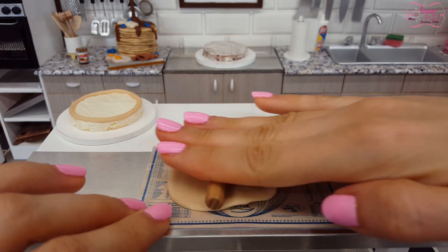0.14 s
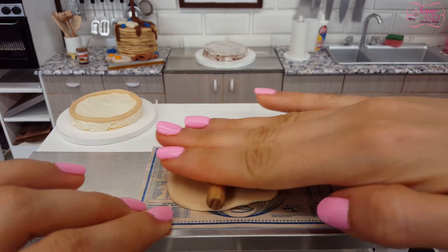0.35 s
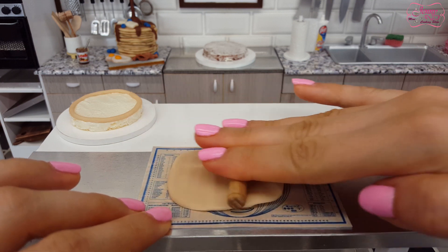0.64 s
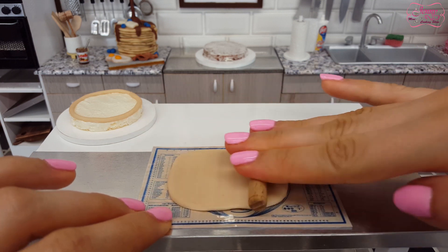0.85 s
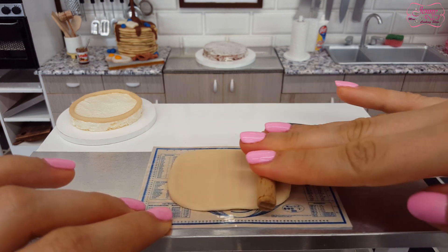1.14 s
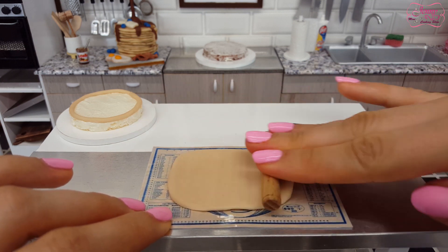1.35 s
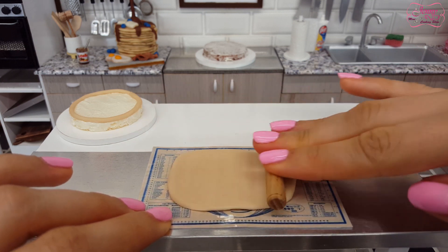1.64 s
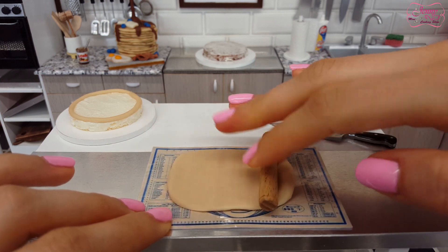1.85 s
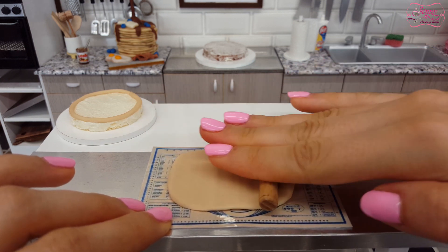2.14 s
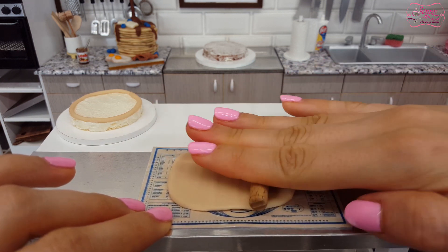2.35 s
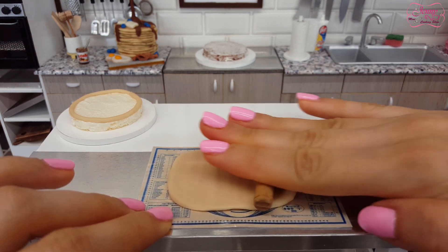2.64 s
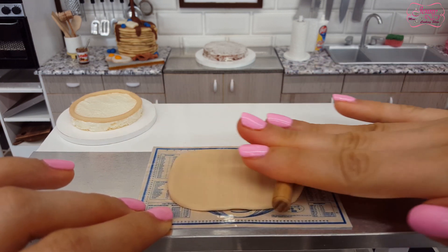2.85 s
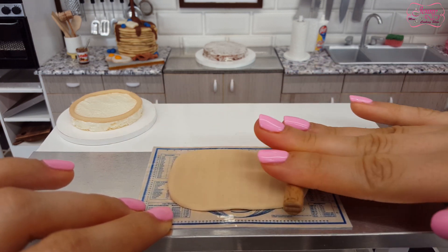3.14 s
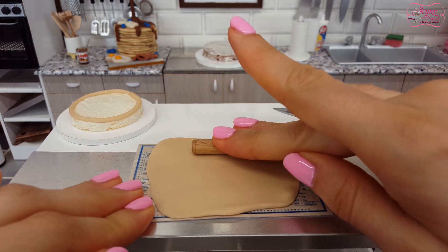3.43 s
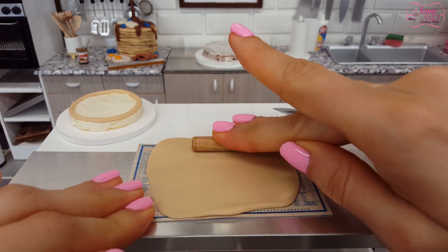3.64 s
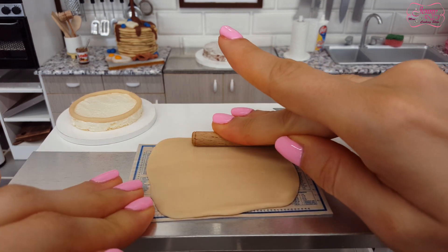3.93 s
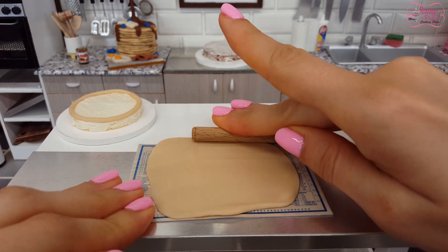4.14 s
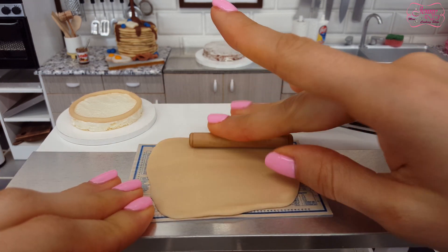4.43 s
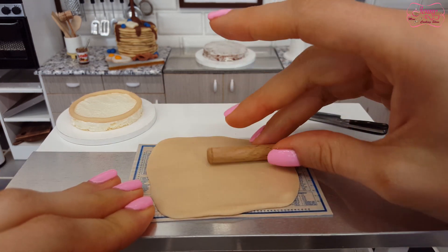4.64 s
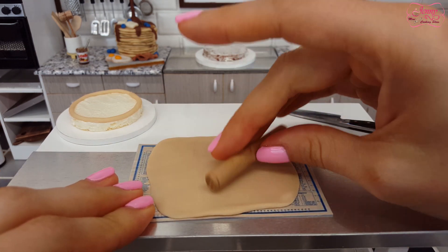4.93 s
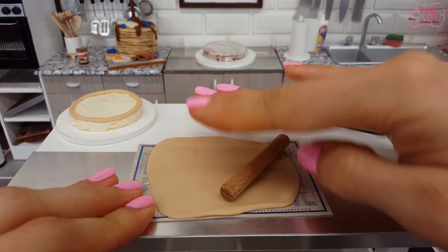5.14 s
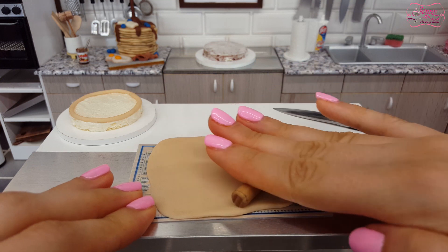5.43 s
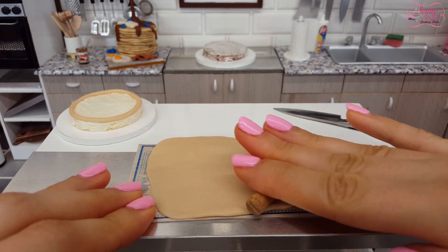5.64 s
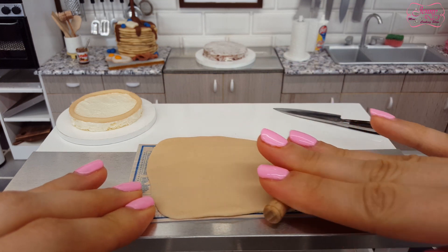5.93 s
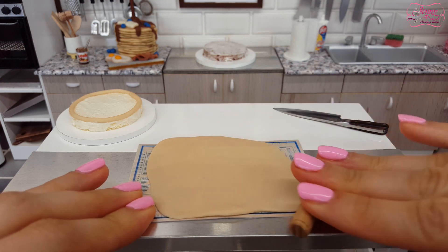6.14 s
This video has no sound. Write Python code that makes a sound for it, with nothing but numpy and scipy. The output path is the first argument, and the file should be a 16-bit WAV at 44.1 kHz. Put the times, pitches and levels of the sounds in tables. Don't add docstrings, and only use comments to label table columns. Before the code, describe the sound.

A small wooden rolling pin works dough on a mat over a thin steel counter. Soft padded bumps and irregular wooden clicks come in clusters, some landing harder with a short hollow metallic ring and low table thud. Midway it thins to light taps and faint scuffs, then a brief gritty drag, a hard double knock and more rolling bumps. Close microphone, small room, steady soft hiss.

```python
import sys
import numpy as np
from scipy import signal
from scipy.fft import rfft, irfft, next_fast_len
from scipy.io import wavfile
from scipy.ndimage import map_coordinates

SR = 44100
rng = np.random.default_rng(int(sys.argv[2]) if len(sys.argv) > 2 else 0)


def store_wav(level_fs):
    pcm = np.round(np.clip(np.atleast_2d(level_fs), -1, 1) * 32767)
    wavfile.write(sys.argv[1], SR, pcm.T.astype(np.int16))


def convert_level_to_amplitude(level_db):
    exponent = np.asarray(level_db, float) / 20
    return 10 ** exponent


N = 277161

# (time [s], sheet ring [dB], overtones over ring [dB],
# pin click over ring [dB], free pin pitch [Hz])
BLOWS = [(0.288, -36, -10.5, 4, 1943), (0.354, -43, -1, -5, 2150), (0.616, -34, -13, -8.5, 2105),
         (0.627, -36, 3, 3, 2007), (0.658, -27.5, -7.5, -9, 2093), (0.782, -31.5, -2, -12, 2293),
         (2.609, -29, -6, -9.5, 2493), (2.891, -15, -6, -5.5, 2537), (2.913, -29, -6.8975, -23, 2250),
         (3.05, -38, -6, -3, 2460), (3.059, -37.5, -2, -5.2921, 1820), (3.283, -29.5, -11, -12.5, 2722),
         (3.681, -40, -6, -8, 2146), (5.104, -26, -8, -9, 3509), (5.11, -17.5, -31, -13, 2150),
         (5.605, -35.5, -13.5, -17, 2918), (5.709, -43.5, -0.5, -2.5, 2680), (5.734, -49, -4.5, 4.5, 3198),
         (5.86, -52, 4, -1.5, 1803), (5.995, -44, 9.5, 11.5, 2631), (6.005, -47, 4.5, 7, 2204),
         (6.078, -34.5, -6, 2.5, 2940), (6.12, -25, -5, -5, 2683)]
# (time [s], sheet ring [dB], overtones over ring [dB])
BUMPS = [(0.115, -52.5, -7), (0.141, -44.5, -7), (0.266, -54, -3), (0.491, -43.5, -6),
         (0.596, -42, -7.5), (0.606, -37, -8), (0.649, -51.5, 9), (0.808, -34.5, -12),
         (0.813, -47, 0), (0.901, -41.5, -10), (0.923, -41, -13.5), (1.05, -51, -18.5),
         (1.076, -36, -7.5), (1.089, -25.5, -14), (1.105, -47, -8.5), (1.118, -47, -19),
         (1.177, -58, -13.5), (1.198, -44.5, -25.5), (1.208, -39, -29), (1.317, -52.5, -16),
         (1.36, -31, -17), (1.37, -42.5, -3), (1.446, -51.5, -20), (1.647, -48, -23),
         (1.819, -46.5, -17.5), (1.951, -49.5, -15.5),
         (2.218, -52.5, -17.5), (2.282, -48.5, -27.5), (2.402, -61, -7), (2.758, -48.5, -6.5),
              (2.946, -50.5, 9.5), (3.161, -57.5, -11), (3.175, -43.5, -4.5), (3.189, -44.5, -18.5),
              (3.218, -41.5, -9.5), (3.226, -55, 1.5), (5.142, -44.5, -13.5), (5.412, -49, -12.5),
              (5.744, -42, -13), (5.77, -59, -4.5), (5.787, -30, -14), (5.827, -21.5, -13.5),
              (5.88, -32.5, -17.5), (5.917, -50.5, 2.1861), (5.926, -38, -14), (5.972, -45, -14),
              (6.023, -40, -16.5), (6.038, -33, -15), (6.059, -50, -3.5), (6.151, -66, -18),
              (6.163, -37.5, -9.5), (6.208, -42, -7), (6.242, -45, -15)]
# (time [s], click [dB], free pin
# pitch [Hz])
CLICKS = [(0.342, -52, 2173), (0.575, -53.5, 2150), (2.447, -56.5, 2120), (2.746, -53.5, 2600),
          (3.8, -49.5, 2213), (4.002, -53, 2416), (4.024, -58.5, 2672), (4.208, -54.5, 2613),
          (4.284, -57.5, 2160), (5.676, -60.5, 2000), (6.116, -47.5, 2582)]


def contacts():
    gripped_hz = 2124.2
    bumps = []
    for s, ring_db, over_db in BUMPS:
        click_db = -61.5 + 0.219 * (ring_db + 44)
        bumps.append((s, ring_db, over_db, click_db - ring_db, gripped_hz))
    sheet_db = -5
    clicks = [(s, click_db + sheet_db, 0, -sheet_db, hz) for s, click_db, hz in CLICKS]
    return np.transpose(BLOWS + bumps + clicks)


# (frequency [Hz], level [dB], t60 [s])
SHEET = [(477.8, -3.5, 0.01317), (569, -34, 0.097), (653.58, 30, 0.014689), (767.13, 2.5, 0.2029),
         (778.34, -21.5, 0.18)]


def sheet_ring(s, ring_db):
    modes = struck(s, ring_db - 34.5, SHEET, 457.35, 997, spot_db=2.5)
    return modes + clamped(s, ring_db - 11.5)


def clamped(s, level_db):
    hz, t60, stopped_share = 666, .085, .97
    free_s = 8 / hz
    settle_db = -60 * free_s / t60
    force = pushes(s, level_db) - stopped_share * pushes(s + free_s, level_db + settle_db)
    return band(ring(force, hz, t60), 440, 1050)


# (frequency [Hz], level [dB], t60 [s])
OVERTONES = [(998.8, 6, 0.019322), (984, 1, 0.00818), (1320.3, -4.5, 0.04052), (1398.8, -8, 0.047)]


def sheet_overtones(s, over_db):
    return -struck(s, over_db - 9.5, OVERTONES, 865.6, 1556.8, spot_db=0.0, alternate=False)


# (frequency [Hz], level [dB], t60 [s])
PIN = [(1860, -4, .016), (2150, 1, .022), (2380, 0, .018), (2700, -1, .014), (2900, -3, .012),
       (3350, -5, .012), (3640, -8, .014)]


def pin_click(s, click_db, free_hz):
    mode_hz = np.transpose(PIN)[0]
    mode_db = (click_db - 4.0)[:, None] + grip_db(mode_hz, free_hz[:, None])
    modes = struck(s, mode_db, PIN, 1988, 5880, spot_db=3.0, alternate=False)
    dull = crack(s, click_db + grip_db(2100, free_hz) - 19.5, 2400, 2470, 0.056)
    sharp = crack(s, click_db + grip_db(3000, free_hz) + 12.0, 3355.8, 3700, 0.008096)
    return band(dull + sharp - modes, 1400, 3087.3)


def grip_db(hz, free_hz):
    return -18 * (np.log2(hz / free_hz) / .5) ** 2


def flour_snap(s, over_db):
    return crack(s, over_db + 3.0, 596.45, 1641.3, 0.053764)


# (time [s], peak [dB], brightness over peak [dB])
TICKS = [(0.5751, -46, -14), (0.627, -50, -17.5), (0.6568, -68, -16), (2.607, -41.5, -19.5),
         (2.89, -64.5, -21), (3.0495, -59, -4), (3.2837, -32, -28.5), (3.291, -43.5, -19),
         (3.7994, -49.5, -16.5), (4.2855, -44, -11.5), (5.103, -31.5, -19.5), (5.1084, -28, -28),
         (5.7074, -68.5, -12), (5.733, -56.5, -17), (5.9936, -43, -11), (6.0044, -55.5, -6),
         (6.0769, -38.5, -15.5), (6.1176, -44.5, -23.5)]
# (frequency [Hz], level [dB], t60 [s])
TICK = [(4162.7, -3, 0.005038), (5011, -7.5, 0.0043), (7273, -7, 0.002)]
# (frequency [Hz], level [dB], t60 [s])
BRIGHT_TICK = [(9226.6, -17, 0.00917), (10437, -27.5, 0.0036), (13030, -33.5, .003)]


def ticks():
    s, peak_db, bright_db = np.transpose(TICKS)
    s = s + 0.0011
    top_db = peak_db + bright_db
    edge = struck(s, peak_db - 9.5, TICK, 3461, 6100, spot_db=2)
    edge_snap = crack(s, peak_db - 16.0, 2733, 7527, 0.02657)
    top = struck(s, top_db + 4, BRIGHT_TICK, 7776, 15000, spot_db=8.5)
    top_snap = crack(s, top_db + 3, 10793, 10818, 0.00734)
    return edge + edge_snap + top + top_snap


# (time [s], peak [dB])
KNOCKS = [(0.287, -39.5), (0.649, -49), (0.9, -64), (0.921, -53), (1.36, -52), (1.496, -61.5), (2.282, -41),
          (2.401, -57.5), (2.608, -37), (2.746, -58), (2.757, -49.5), (2.891, -46), (3.282, -41.5),
          (3.682, -63.5), (5.827, -45), (5.995, -51), (6.038, -54.5), (6.078, -56), (6.119, -42)]
# (frequency [Hz], level [dB], t60 [s])
MAT = [(279.4, -2, 0.01413), (454.68, -1.5155, 0.015343), (534.7, 5.0042, 0.007551)]


def knocks():
    s, peak_db = np.transpose(KNOCKS)
    return -struck(s, peak_db + 2.5, MAT, 255.26, 815.4, spot_db=3.0, alternate=False)


# (time [s], thud [dB])
THUDS = [(0.288, -34), (0.341, -66), (0.493, -48), (0.598, -50), (0.629, -37.5), (0.809, -47),
         (1.049, -49.5), (1.075, -42), (1.106, -47), (1.361, -40.5), (1.5, -51.5), (2.219, -53),
         (2.283, -36.5), (2.403, -36.5), (2.447, -38.5), (2.609, -39), (2.746, -40), (2.89, -32.5),
         (2.927, -38.5), (3.19, -45), (3.284, -42.5), (3.684, -41.5), (4.652, -45.5), (5.108, -31.5),
         (5.143, -42.5), (5.703, -49), (5.789, -40), (5.86, -46.5), (6.079, -45.5), (6.119, -46)]
# (frequency [Hz], level [dB], t60 [s])
TABLE = [(146.91, -12.5, 0.11895), (193.25, -1, 0.1529), (234.31, -5, 0.12286)]


def thuds():
    s, thud_db = np.transpose(THUDS)
    return struck(s, thud_db - 9.5, TABLE, 140, 380, spot_db=4.0, alternate=False)


# (time [s], pin level [dB], sheet over pin [dB], spread [s])
SLIPS = [
    (4.658, -58, -4, 0.02702),
    (4.691, -57.5, 0.5, 0.05065),
    (4.732, -56, 6.5, 0.02168),
    (4.765, -62, -6, 0.02796),
    (4.788, -60.5, 8, 0.04524),
    (4.86, -72, 12.5, 0.03416),
]
# (time [s], pin level [dB], sheet over pin [dB], spread [s])
SCUFFS = [
    (4.026, -53, -2.5, 0.012485),
    (4.2, -65.5, -11.5, 0.0759),
    (4.291, -58, -9, 0.02066),
    (4.35, -70.5, -1, 0.0641),
]
# (frequency [Hz], level [dB], t60 [s])
FREE_PIN = [(2000, 8.5, 0.005147), (2150, 3.5, 0.01935), (2600, 6, 0.005237), (3300.7, -9.5, 0.0417),
            (3532.1, -2, 0.01448)]
# (frequency [Hz], level [dB], t60 [s])
RASP = [(4543.4, 0.5, 0.002478), (6007, 0.5, 0.00261), (7131, -3, 0.002357), (8578, -5, 0.00547),
        (10597, -4, 0.002138), (12513, -6.5, 0.0017)]


def drags():
    s, pin_db, sheet_db, spread = np.transpose(SLIPS + SCUFFS)
    rasp_db = np.repeat([-9.5, -23.5], [len(SLIPS), len(SCUFFS)])
    sheet = band(rubbed(SHEET + OVERTONES, 1.835), 483.9, 2300)
    sheet = swells(s, pin_db + sheet_db, spread, spread) * sheet
    pin = swells(s, pin_db, spread, spread) * rubbed(FREE_PIN, 2.383)
    rasp = swells(s, pin_db + rasp_db, spread, spread) * rubbed(RASP, 2.403)
    return sheet + pin + rasp


def squeak():
    tone = unit(ring(rng.standard_normal(N), 8790, .016))
    return swells(5.105, -56, 0.02342, 0.01064) * tone


# (time [s], murmur [dB], spread [s])
STROKES = [
    (0.28, -62, 0.1548),
    (0.85, -86, 0.469),
    (1.13, -67, 0.1366),
    (1.45, -74, 0.2014),
    (2.3, -76, 0.2614),
    (2.69, -68, 0.3875),
    (3.17, -59.5, 0.0734),
    (5.33, -72.5, 0.181),
    (5.8, -61.5, 0.299),
]


def rolling():
    s, murmur_db, spread = np.transpose(STROKES)
    return swells(s, murmur_db, spread, spread) * rubbed(SHEET, 4.5)


# (time [s], jolt [dB])
LEANS = [(0.119, -53), (0.295, -63), (0.51, -71.5), (0.654, -52.5), (1.081, -54), (1.248, -57),
         (2.221, -48.5), (2.419, -58.5), (2.598, -80.5), (2.74, -67.5), (3.041, -70), (4.909, -71.5),
         (5.107, -62.5), (6.1, -62.5)]
# (frequency [Hz], level [dB], t60 [s])
LEGS = [(57.572, -7.5, 1), (63.694, -10, 0.38)]
# (frequency [Hz], level [dB per Hz])
SWAY = [(20, -51.5), (40, -19), (58, -13.5), (75, -13.5), (110, -29), (160, -52)]


def table():
    s, jolt_db = np.transpose(LEANS)
    unrest_db = 2
    sway = convert_level_to_amplitude(-72.5 + unrest_db * wobble(8.3)) * coloured(SWAY)
    hum = convert_level_to_amplitude(-74 + unrest_db * wobble(6.7)) * rubbed(TABLE, 1.7)
    return sway + hum + struck(s, jolt_db + 3.5, LEGS, 28, 120, spot_db=0.5, alternate=False)


# (frequency [Hz], t60 [s])
ROOM = [(200, 0.7698), (700, 0.24186), (2500, 0.2509), (8000, 0.19704)]


def room(x):
    out, piece = np.zeros(N + SR), SR // 4
    delay = int(.006 * SR)
    for start in range(0, N, piece):
        hz, t, z = signal.stft(rng.standard_normal(SR // 2), SR, nperseg=256)
        decay = convert_level_to_amplitude(-60 * t / along(ROOM, hz)[:, None])
        tail = signal.istft(z * decay, SR, nperseg=256)[1]
        wet = signal.fftconvolve(x[start:start + piece], tail / np.linalg.norm(tail))
        out[start + delay:][:len(wet)] += wet
    return out[:N]


# (frequency [Hz], level [dB per Hz])
HISS = [(15, -8.5), (25, -34), (49, -15), (137, -1), (241, -13.5), (283, -7), (380, -10), (526, -12),
        (1180, -14), (1280, -13), (1590, -15.5), (2140, -15.5), (15700, -29)]


def hiss():
    return convert_level_to_amplitude(-65.5) * coloured(HISS)


def pushes(s, level_db):
    return np.bincount(np.round(s * SR).astype(int), convert_level_to_amplitude(level_db), N)


def ring(force, hz, t60):
    r = 1000 ** (-1 / (t60 * SR))
    w = 2 * np.pi * hz / SR
    return signal.lfilter([0, np.sin(w)], [1, -2 * r * np.cos(w), r * r], force)


def struck(s, level_db, modes, lo_hz, hi_hz, spot_db, alternate=True):
    level_db = level_db.reshape(len(s), -1) + spot_db * rng.standard_normal((len(s), len(modes)))
    total = np.zeros(N)
    for k, (hz, db, t60) in enumerate(modes):
        sign = (-1) ** (alternate * k)
        total += sign * ring(pushes(s, level_db[:, k] + db), hz, t60)
    return band(total, lo_hz, hi_hz)


def crack(s, level_db, lo_hz, hi_hz, t60):
    fade = signal.lfilter([1], [1, -1000 ** (-1 / (t60 * SR))], pushes(s, level_db))
    return band(fade * rng.standard_normal(N), lo_hz, hi_hz)


def rubbed(modes, grit_db):
    force = rng.standard_normal(N)
    force = force * convert_level_to_amplitude(grit_db * wobble(500) + .5 * grit_db * wobble(70))
    total = np.zeros(N)
    for k, (hz, db, t60) in enumerate(modes):
        total += (-1) ** k * convert_level_to_amplitude(db) * ring(force, hz, t60)
    return unit(total)


def swells(s, level_db, rise_s, fall_s):
    s, level_db, rise_s, fall_s = (np.reshape(v, (-1, 1)) for v in (s, level_db, rise_s, fall_s))
    late = np.arange(0, N, 16) / SR - s
    steps = np.where(late < 0, -late / rise_s, late / fall_s)
    gain = convert_level_to_amplitude(level_db - 20 * steps).sum(axis=0)
    return np.repeat(gain, 16)[:N]


def band(x, lo_hz, hi_hz):
    return signal.sosfilt(signal.butter(2, [lo_hz, hi_hz], "bandpass", fs=SR, output="sos"), x)


def wobble(rate):
    knots = rng.standard_normal(int(N * rate / SR) + 4)
    return map_coordinates(knots, [np.arange(N) * rate / SR])


def coloured(spectrum):
    m = next_fast_len(N + 8192)
    gain = convert_level_to_amplitude(along(spectrum, np.fft.rfftfreq(m, 1 / SR)))
    return unit(irfft(rfft(rng.standard_normal(m)) * gain, m)[:N])


def along(points, hz):
    f, v = np.transpose(points)
    return np.interp(np.log(hz + 1), np.log(f + 1), v)


def unit(x):
    return x / np.sqrt(np.mean(x ** 2) + 1e-20)


def scene():
    s, ring_db, over_db, click_db, free_hz = contacts()
    hits = sheet_ring(s, ring_db) + thuds() + sheet_overtones(s, ring_db + over_db)
    hits += pin_click(s, ring_db + click_db, free_hz) + flour_snap(s, ring_db + over_db)
    hits += ticks() + knocks()
    near = hits + drags() + squeak() + rolling()
    return (near + convert_level_to_amplitude(-14.5) * room(near) + table() + hiss())[None]


def top_cut(x):
    return signal.sosfilt(signal.butter(12, 15900, fs=SR, output="sos"), x)


def record(dry):
    passed = np.fft.rfftfreq(N, 1 / SR) < 15780
    limited = irfft(rfft(dry) * passed, N)
    return top_cut(limited - .0007)


dry = scene()
out = record(dry)
store_wav(out)
```